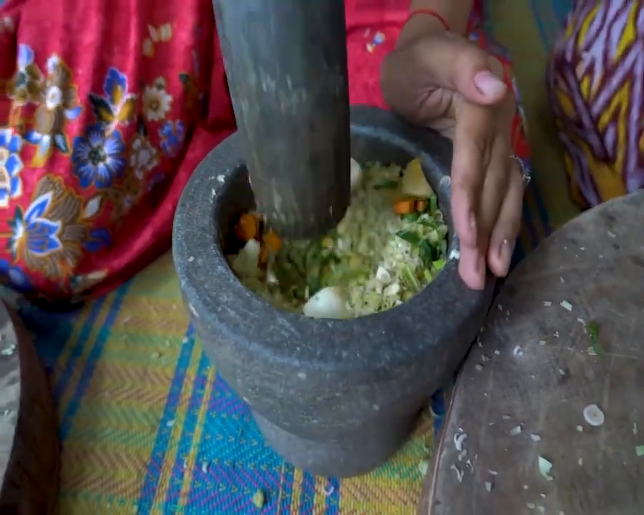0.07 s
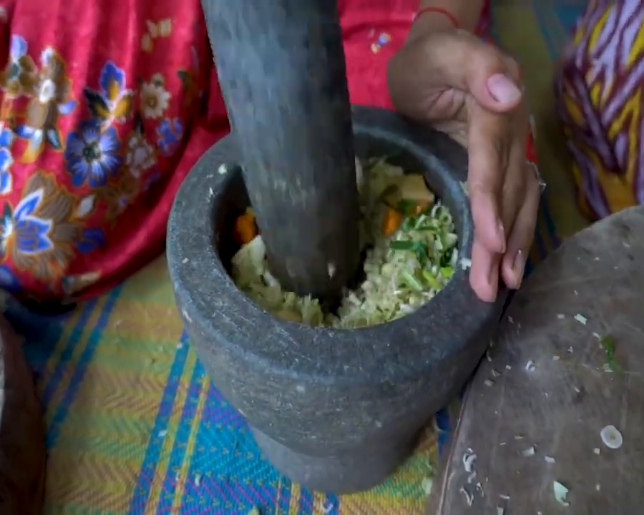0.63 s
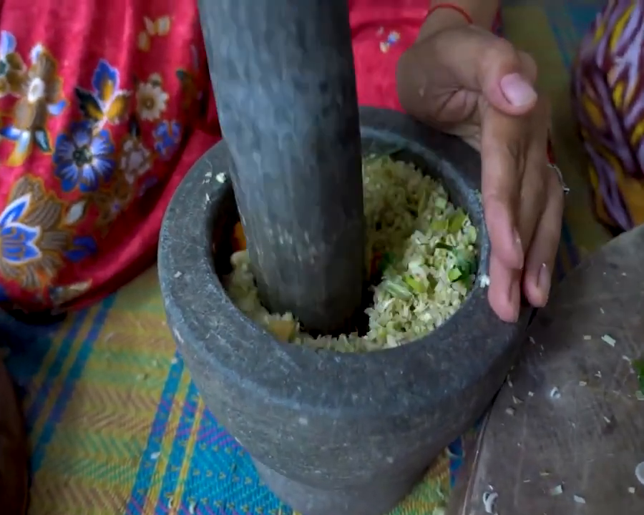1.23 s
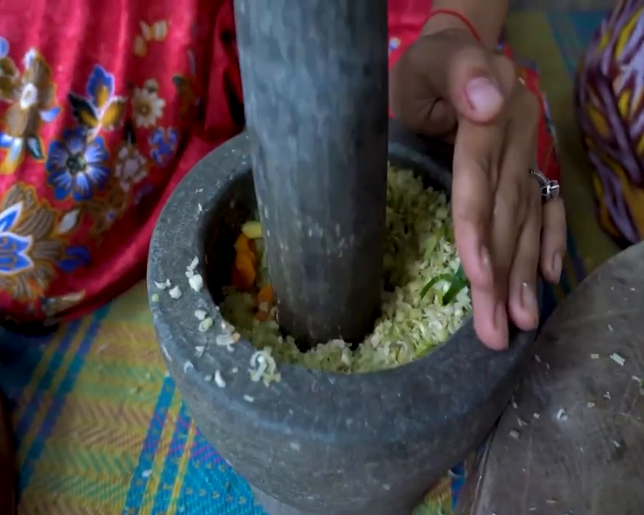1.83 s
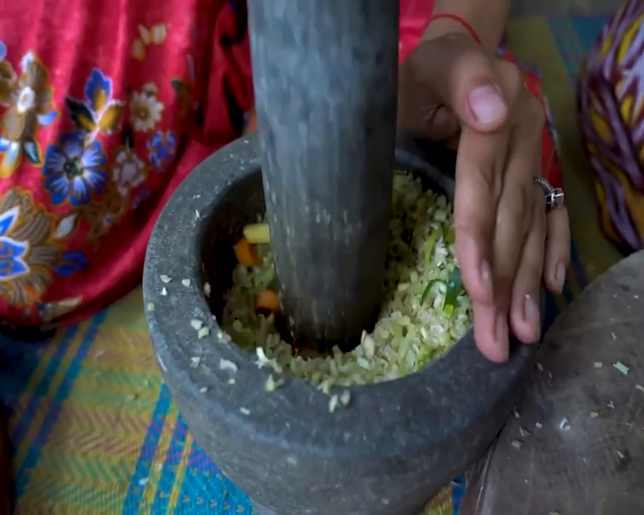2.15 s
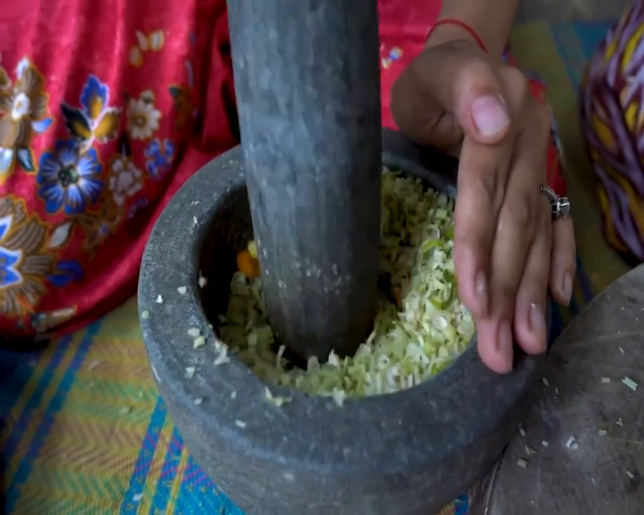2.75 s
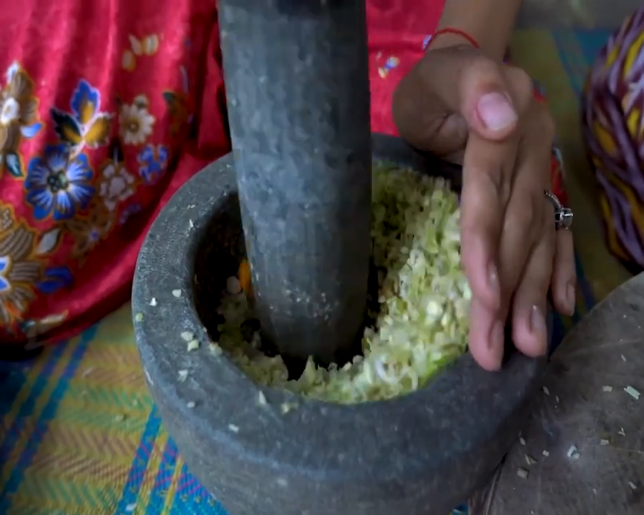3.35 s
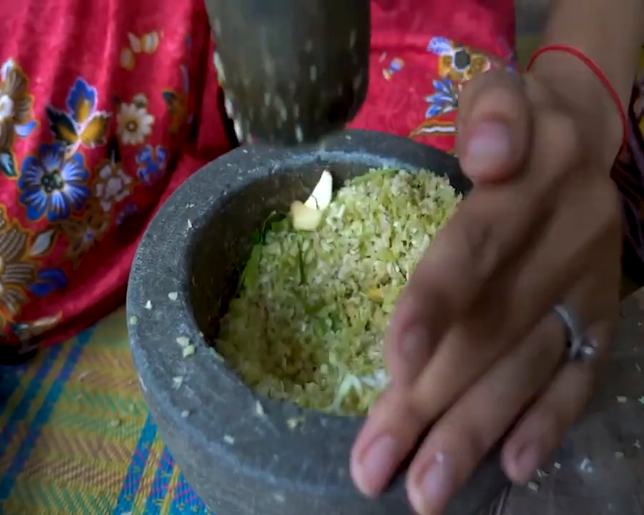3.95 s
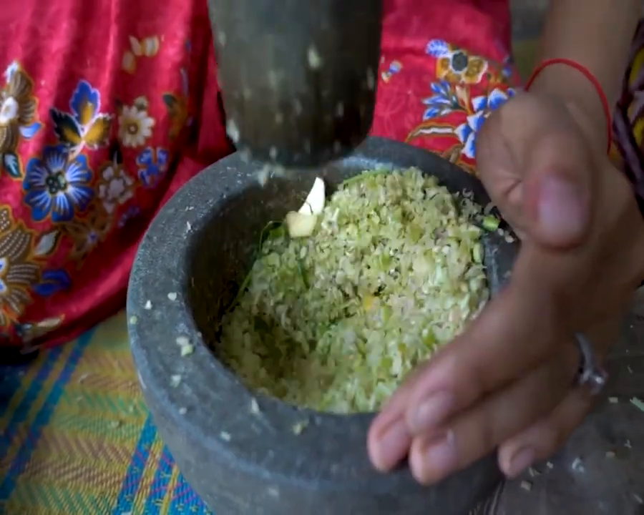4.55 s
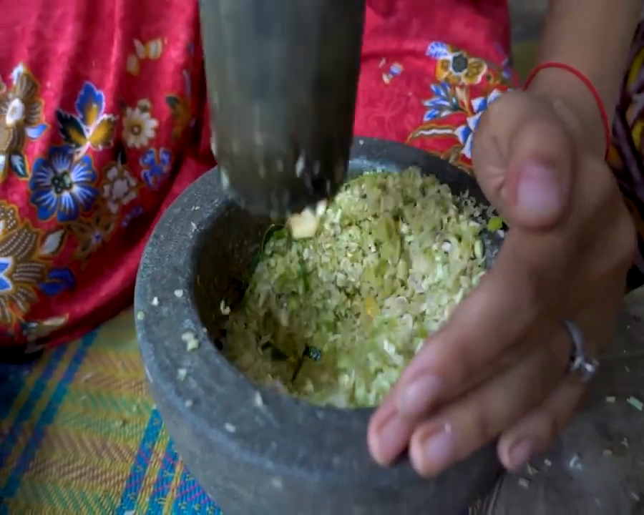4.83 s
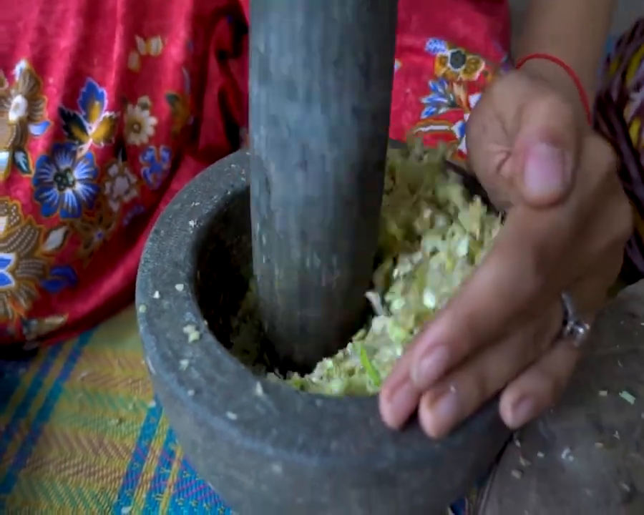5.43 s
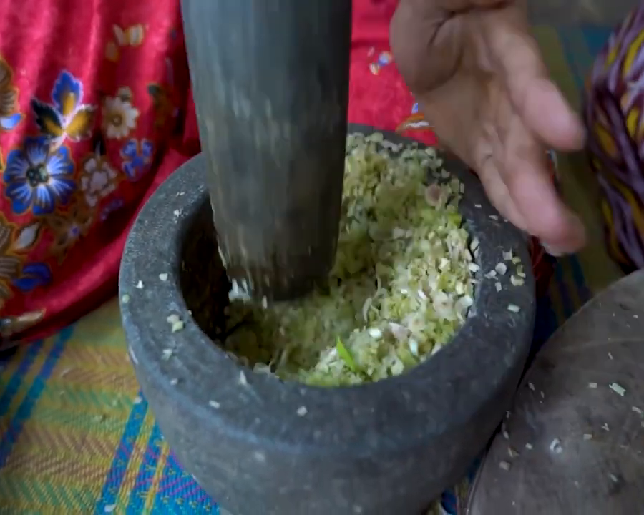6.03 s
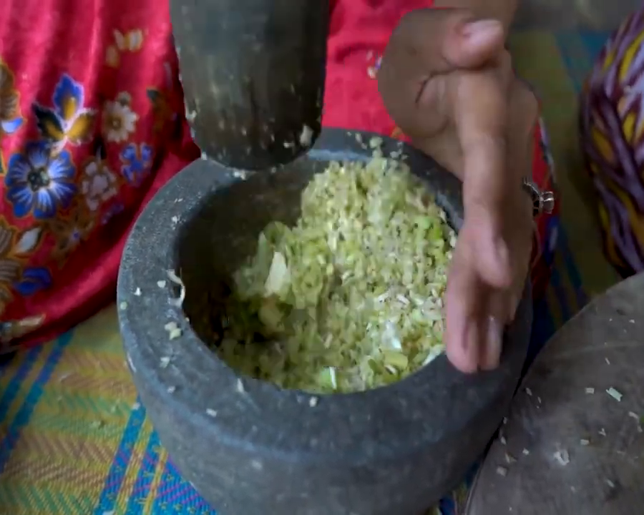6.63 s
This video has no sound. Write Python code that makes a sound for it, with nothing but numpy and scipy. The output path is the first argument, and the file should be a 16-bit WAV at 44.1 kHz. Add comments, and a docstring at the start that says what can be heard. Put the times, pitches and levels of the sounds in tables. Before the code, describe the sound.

Close, even pounding of herbs and garlic in a stone mortar outdoors, each blow a moist crunch and a low thump.

```python
"""Outdoors, a stereo microphone close to a stone mortar on a mat. Over a faint hush and brushing clothes,
a long stone pestle pounds chopped herbs, about three blows a second. The early blows pop whole cloves.
Each blow bursts wet fibres, rings the air in the bowl, then drives the mortar into the mat with a thud;
hard ones rock its foot. Left and right slip apart by up to a few ms, differently from blow to blow.
Later, crumbs fall back, a hand nudges the mortar, and the crunch brightens as the herbs turn to paste."""
import sys
import numpy as np
from scipy import signal
from scipy.fft import rfft, irfft
from scipy.io import wavfile

SR = 44100
rng = np.random.default_rng(int(sys.argv[2]) if len(sys.argv) > 2 else 0)


def generate_wav(signal):
    """Clip the signal to [-1, 1] and save it as 16-bit WAV at the path in sys.argv[1]."""
    frames = np.transpose(np.atleast_2d(signal))
    scaled = np.clip(frames, -1, 1) * 32767
    pcm = np.round(scaled).astype(np.int16)
    wavfile.write(sys.argv[1], SR, pcm)


N = 294147
SPAN, LEAD = 16384, 2048  # samples in one event, and how many come before its onset
T = (np.arange(SPAN) - LEAD) / SR  # time around one event

# spectrum of the outdoor hush: f/Hz, relative level/dB
HUSH_SPECTRUM = [(25, -12.5), (60, -3.5), (100, -0.5), (160, -8), (260, -13.5), (600, -13), (1200, -17),
                 (2500, -21), (5000, -23), (8000, -29.5), (12000, -33), (16000, -37.5)]
# cloth sliding as the arm moves: t/s, half length/s, f/Hz, level/dB
SLEEVE_SWISHES = [(0.44, 0.17, 9950, -64), (0.915, 0.043, 2800, -50.5), (2.025, 0.12, 1880, -62),
                  (2.72, 0.088, 7000, -71), (3.704, 0.063, 5800, -63), (5.7, 0.024, 5100, -63.5),
                  (6.01, 0.034, 2430, -61)]
# cloves and roots giving way or knocked by the pestle:
# t/s, crack level/dB, f/Hz, t60/s, bowl air level/dB, left minus right/dB
CLOVE_POPS = [ (0.0448, -39, 1470, 0.12, -34.5, -19), (.1700, -26, 2270, 0.022, -37.5, -11),
              (.3262, -48, 1900, 0.029, -39.5, -7), (.6280, -30.5, 900, 0.041, -22, -22),
              (.9690, -24, 3170, 0.015, -30, -6), (1.2673, -28.5, 1690, .014, -41, -5),
              (1.577, -37, 1570, .03, -33, -4)]
# pestle blows: t/s, crush level/dB, crush spread/s, bowl air level/dB, thud level/dB,
# thud left minus right/dB, left delay/s
PESTLE_BLOWS = [ (0.0746, -30, 0.0041, -35.5, -24, -4.5, -0.0043),
                (.3529, -28, 0.0022, -41, -14.5, 8, -0.004), (.6466, -26, 0.003, -33, -21, -1, -.0044),
                (.9703, -21.5, 0.0014, -23, -41.5, 14, -.003),
                (1.283, -23, 0.0041, -43, -21, 2.5, 0.000025),
                (1.5862, -23.5, 0.0017, -33, -22.5, 15, -0.011),
                (1.9002, -26.5, 0.0018, -40, -23.5, 3.5, 0.00014),
                (2.1974, -21, 0.0029, -32, -25.5, 16.5, -0.0015),
                (2.51, -20, 0.003, -32, -18.5, 0, -0.0011),
                (2.837, -19.5, 0.0023, -30, -15.5, 4.5, 0.00041),
                (3.1363, -19.5, 0.0024, -31, -15.5, 6, 0.00018),
                (3.4717, -21.5, 0.0036, -39, -29, -1, -0.00032),
                (3.8088, -19, 0.0023, -28, -13.5, 2.5, -0.0013), (4.1765, -18, 0.0024, -26, -12, 2, -.0006),
                (4.5154, -22, 0.0017, -27, -11, 1, -.0007), (4.8277, -19.5, .0024, -24.5, -17, -12, 0.0047),
                (5.1468, -21.5, .0015, -25, -16, 15, -0.0063), (5.4692, -23, 0.002, -34, -22, 2.5, .0024),
                (5.8103, -26.5, 0.0027, -35, -13, 1.5, -.0002),
                (6.2257, -26, 0.002, -43, -20, -1.5, 0.00051),
                (6.5621, -28, 0.0026, -49, -17.4, 1.5, 0.00048)]
# colour of bursting fibres as it leaves the bowl: f/Hz, gain/dB
FIBRE_SPECTRUM = [(150, -11), (300, -15.5), (430, 4), (570, -6), (800, -3), (1080, -4.5), (1500, 1),
                  (2500, 1), (3600, -5), (6200, -3), (8000, -8.5), (10500, -12), (13000, -20),
                  (16000, -23.5)]
# resonances of the narrow gap between pestle and wall: multiple of the gap pitch, width/Hz, gain/dB
GAP_MODES = [(0.998, 197, 2), (1.629, 233, -3), (4, 497, -12)]
# the crunch brightening as the herbs get wetter: t/s, treble gain/dB
WETNESS_TREBLE = [(0, -0.5), (2.4, -1.5), (4.2, 3.5), (6.6, 2)]
# how much weaker the crush is on the microphone's left side: f/Hz, gain/dB
LEFT_LOSS = [(300, -3), (800, -3.5), (2000, -5.5), (4000, -2), (7500, -9.5), (12000, -7.5)]
# the mortar bouncing on the mat: f/Hz, width/Hz, gain/dB
MAT_MODES = [(61.3, 39, -11.5), (103.7, 113.4, 10.5), (160.9, 21, -6), (243, 75, -6.5)]
# its foot rocking on the ground: f/Hz, width/Hz, gain/dB
FOOT_MODES = [(392, 126, -1.5), (469, 113, -2.5), (694, 150, -8.5)]
# crumbs falling on the rim and mat: t/s, level/dB, left minus right/dB
CRUMB_FALLS = [(1.6936, -55.5, -13), (1.7385, -60, -15), (1.7637, -51.5, -10), (2.9765, -62.5, -14),
               (4.0716, -56, -10)]
# the mortar shifting softly on the mat: t/s, level/dB, left minus right/dB
HAND_NUDGES = [(1.701, -47, 10), (3.291, -47, 5), (3.516, -40.5, 3), (3.584, -34, 1), (3.612, -42.5, 10),
               (5.690, -50, 13), (6.036, -48.5, 16), (6.281, -49, 14), (6.38, -46.5, 9), (6.636, -44, 6)]


def undb(db):
    """Decibels to gain."""
    return 10 ** (np.asarray(db) / 20)


def at_level(x, db):
    """Scale a short sound to the energy of 10 ms at this level."""
    return x * undb(db) / np.sqrt(np.sum(x ** 2) / (SR / 100) + 1e-18)


def colour(x, points):
    """Causal filter through (f/Hz, gain/dB) points, built from the cepstrum."""
    n = x.shape[-1]
    hz, db = np.transpose(points)
    f = np.maximum(np.fft.rfftfreq(n, 1 / SR), 1)
    gain = undb(np.interp(np.log(f), np.log(hz), db))
    cepstrum = irfft(np.log(gain), n)
    cepstrum[1:n // 2] *= 2
    cepstrum[n // 2 + 1:] = 0
    return irfft(rfft(x) * np.exp(rfft(cepstrum)), n)


def resonate(x, hz, width_hz):
    """A resonance applied twice, gain 1 at its centre."""
    b, a = signal.iirpeak(hz, hz / width_hz, fs=SR)
    return signal.lfilter(b, a, signal.lfilter(b, a, x))


def ring(x, modes):
    """Sum of a body's resonances, each (f/Hz, width/Hz, gain/dB)."""
    return sum(undb(db) * resonate(x, hz, width) for hz, width, db in modes)


def fade(t60):
    """Sudden start and exponential decay."""
    return (T >= 0) * np.exp(-np.log(1000) * np.abs(T) / t60)


def grains(spread_db):
    """Dense tiny clicks of very unequal size."""
    return rng.standard_normal(SPAN) * undb(spread_db * np.minimum(rng.exponential(size=SPAN), 5))


def sides(pan_db):
    """Left and right gains, the left higher by pan_db."""
    return undb(np.array([[pan_db], [-pan_db]]) / 2)


def add(out, t, pair, left_delay_s=0):
    """Mix a left-right pair in at time t."""
    for channel, onset in enumerate((t + left_delay_s, t)):
        start = int(round(onset * SR)) - LEAD
        a, b = max(start, 0), min(start + SPAN, N)
        out[channel, a:b] += pair[channel, a - start:b - start]


def hush(db=-54.5):
    """Faint, steady rumble and hiss of the open air, partly shared by both sides."""
    noise = colour(rng.standard_normal(N) + rng.standard_normal((2, N)), HUSH_SPECTRUM)
    return noise / noise.std() * undb(db) * sides(pan_db=-1)


def cloth(brush_db=-66, wander_db=6.8):
    """Clothes brush very faintly all the time, and swish on some strokes."""
    t = np.arange(N) / SR
    drift_db = np.interp(np.arange(N), np.linspace(0, N, 90), rng.uniform(-wander_db, wander_db, 90))
    noise = rng.standard_normal((2, N))
    brush = resonate(noise, hz=1580, width_hz=1330)
    out = brush / brush.std() * undb(brush_db + drift_db)
    for peak_s, half_s, hz, db in SLEEVE_SWISHES:
        swish = resonate(noise, hz, width_hz=hz)
        swell = np.exp(-((t - peak_s) / half_s) ** 2)
        out += swish / swish.std() * undb(db) * swell
    return out


def pops(air_hz=735, upper_hz=860, upper_db=-5, splinter_db=-9, linger_s=0.039):
    """A hard piece cracks; the air in the bowl answers with a hollow note that lasts a little longer."""
    out = np.zeros((2, N))
    note = np.sin(2 * np.pi * air_hz * T) + undb(upper_db) * np.sin(2 * np.pi * upper_hz * T)
    for t, db, hz, t60, air_db, pan_db in CLOVE_POPS:
        crack = resonate(fade(t60) * grains(spread_db=3), hz, width_hz=0.45 * hz)
        splinters = colour(fade(t60) * grains(spread_db=0.5), FIBRE_SPECTRUM)
        air = fade(t60 + linger_s) * note
        pop = at_level(crack, db) + at_level(splinters, db + splinter_db) + at_level(air, air_db)
        add(out, t, pop * undb([[pan_db], [0]]), left_delay_s=0.0007)
    return out


def reflections(x, scatter_db=-26, t60=0.43, echo_s=0.0082, echo_db=-16):
    """A nearby surface sends one thin echo to the microphone; the surroundings add a brief scatter."""
    scatter = fade(t60) * rng.standard_normal((2, SPAN))
    responses = [side[LEAD:] / np.linalg.norm(side) for side in scatter]
    tail = np.array([signal.fftconvolve(side, response)[:N] for side, response in zip(x, responses)])
    thinned = colour(x, [(200, -15), (900, -2), (2000, 0.5)])
    echo = np.roll(thinned, int(echo_s * SR), axis=1)
    return undb(scatter_db) * tail + undb(echo_db) * echo


def crush(db, spread_s, treble_db, air_db, gap_hz, rustle_db=-43, rustle_s=0.012):
    """Fibres burst in a surge; the squeezed air rings in the bowl and in the gap beside the pestle."""
    progress = T / spread_s + 0.5  # the surge peaks just before the middle of the crush
    force = np.exp(-np.logaddexp(-progress / 0.75, progress))  # quick rise, slightly slower fall
    rustle = at_level(np.exp(-np.abs(T) / rustle_s), rustle_db - db)  # loose herbs, before and after
    envelope = at_level(force, 0) + rustle
    shared, left, right = (envelope * grains(spread_db=3.5) for _ in range(3))
    fibres = colour(shared + 0.5 * np.array([left, right]), FIBRE_SPECTRUM)
    fibres += ring(fibres, [(ratio * gap_hz, width, gain_db) for ratio, width, gain_db in GAP_MODES])
    fibres = colour(fibres, [(2500, 0.0059), (6000, treble_db)])
    bowl_air = resonate(force * rng.standard_normal(SPAN), hz=738, width_hz=175)
    left, right = (at_level(side, db) + at_level(bowl_air, air_db) for side in fibres)
    return np.array([colour(left, LEFT_LOSS), right])


def thud(push_s=0.001, tremble_db=-26):
    """A short push bounces the heavy mortar on the mat, never quite alike; the ground trembles on."""
    detune = np.exp(0.06 * rng.standard_normal())
    push = np.exp(-(T / push_s) ** 2)
    bounce = ring(push, [(hz * detune, width, db) for hz, width, db in MAT_MODES])
    tremble = resonate(fade(t60=0.21) * rng.standard_normal(SPAN), hz=96.5, width_hz=97)
    return at_level(bounce, 0) + at_level(tremble, tremble_db)


def rock(db):
    """The foot chatters briefly as the mortar lands again."""
    chatter = fade(t60=0.03) * grains(spread_db=12.5)
    return at_level(ring(chatter, FOOT_MODES), db)


def squelch(db):
    """Wet paste oozes back round the pestle after the blow."""
    ooze = fade(t60=0.042) * grains(spread_db=4.5)
    return at_level(ring(ooze, [(1410, 540, 11), (2720, 1100, 11), (6260, 7300, -5)]), db)


def pounding(first_gap_hz=1593, gap_fall_hz_per_s=24.6, rebound_s=0.0074):
    """Every blow: crush, thud, then the rocking foot, which also stirs the paste."""
    firm_crush_db, firm_thud_db, firm_rock_db = -20.5, -16, -34  # a firm blow; harder ones rock more
    out = np.zeros((2, N))
    for t, crush_db, spread_s, air_db, thud_db, pan_db, left_delay_s in PESTLE_BLOWS:
        treble_db = np.interp(t, *np.transpose(WETNESS_TREBLE))
        gap_hz = first_gap_hz - gap_fall_hz_per_s * t  # the gap sounds lower as the herbs settle
        gap_hz *= np.exp(0.071 * rng.standard_normal())
        thud_t = t + 1.35 * spread_s  # once the herbs are squeezed flat
        rock_db = firm_rock_db + 1.45 * (crush_db - firm_crush_db) + 0.91 * (thud_db - firm_thud_db)
        rebound = np.array([rock(rock_db), rock(rock_db)]) + squelch(rock_db - 8)
        add(out, t, crush(crush_db, spread_s, treble_db, air_db, gap_hz), left_delay_s)
        add(out, thud_t, thud() * undb(thud_db) * sides(pan_db), left_delay_s)
        add(out, thud_t + rebound_s, rebound * sides(pan_db=-3), left_delay_s)
    return out


def crumbs():
    """Crumbs tick as they land on the rim and mat, to the right of the microphone."""
    out = np.zeros((2, N))
    for t, db, pan_db in CRUMB_FALLS:
        tick = resonate(fade(t60=0.018) * grains(spread_db=4), hz=4300, width_hz=7000)
        add(out, t, at_level(tick, db) * sides(pan_db))
    return out


def nudges():
    """The steadying hand shifts the mortar on the mat with a slower, softer push."""
    out = np.zeros((2, N))
    for t, db, pan_db in HAND_NUDGES:
        bump = thud(push_s=0.0025, tremble_db=-7)
        add(out, t, at_level(bump, db) * sides(pan_db))
    return out


def scene():
    """The mortar close to the microphone, in the open air."""
    mortar = pounding() + pops() + crumbs() + nudges()
    return mortar + reflections(mortar) + cloth() + hush()


def record(dry, top_hz=16000):
    """The recorder cuts the top treble steeply."""
    return signal.sosfilt(signal.ellip(8, 0.2, 70, top_hz, fs=SR, output="sos"), dry)


dry = scene()
out = record(dry)
generate_wav(out)
```